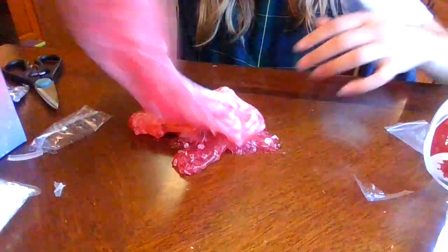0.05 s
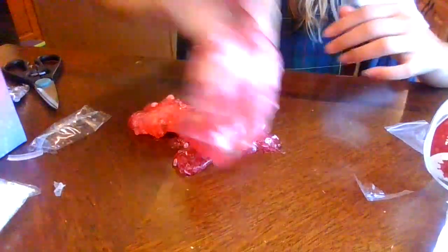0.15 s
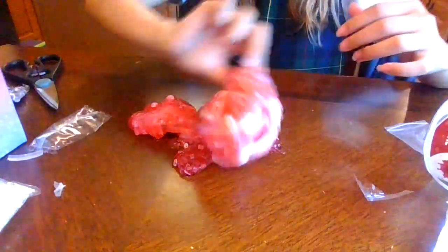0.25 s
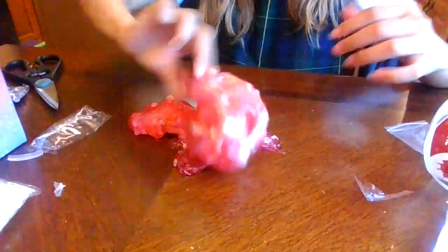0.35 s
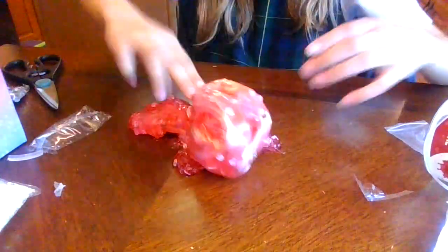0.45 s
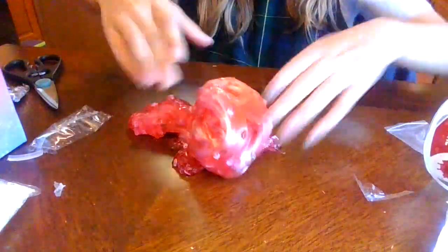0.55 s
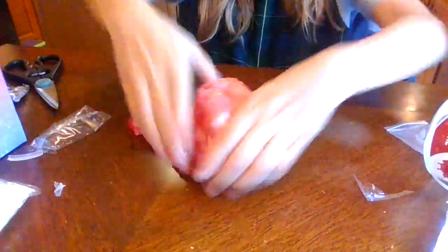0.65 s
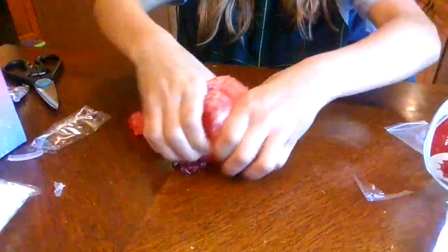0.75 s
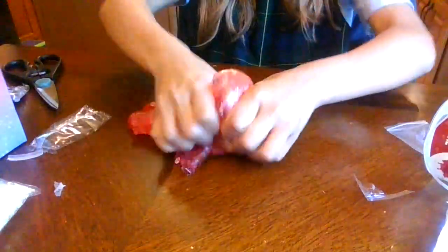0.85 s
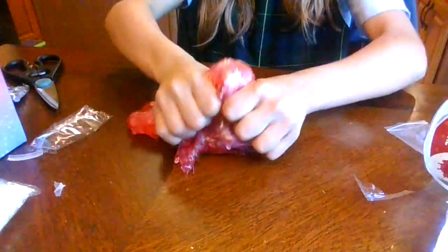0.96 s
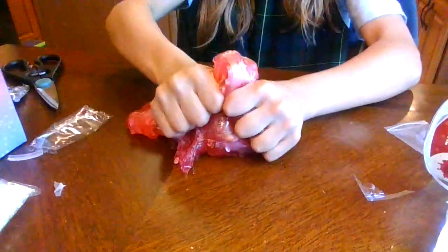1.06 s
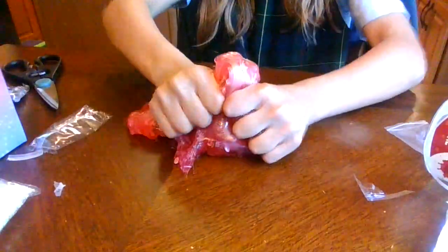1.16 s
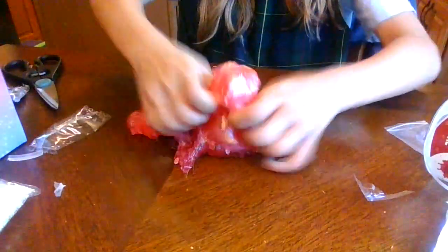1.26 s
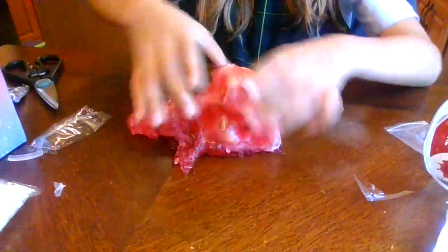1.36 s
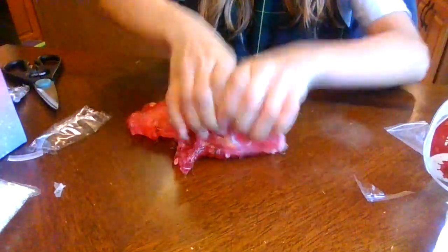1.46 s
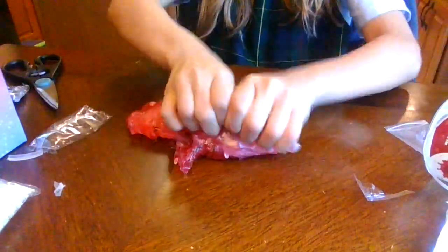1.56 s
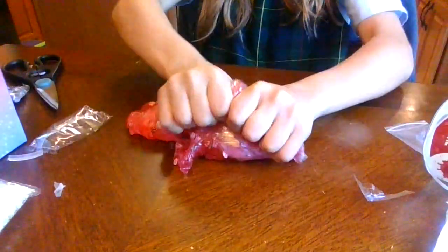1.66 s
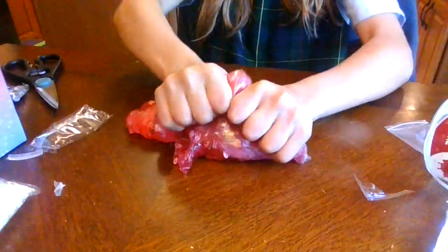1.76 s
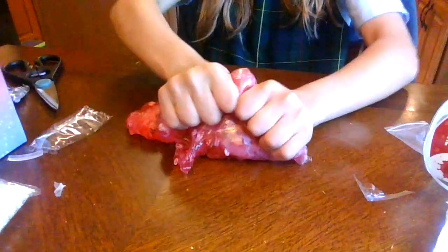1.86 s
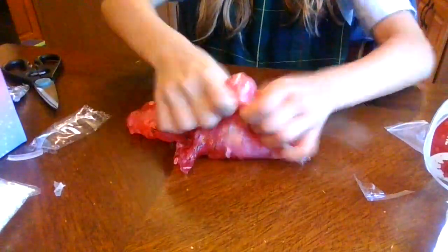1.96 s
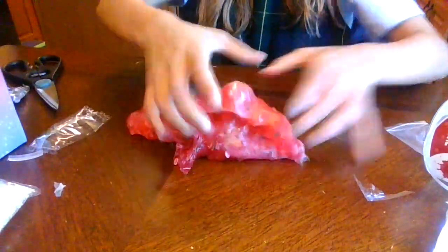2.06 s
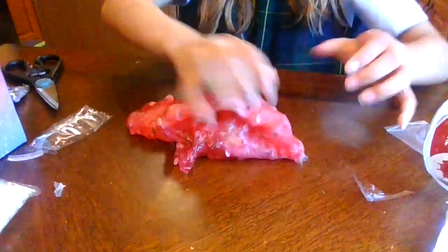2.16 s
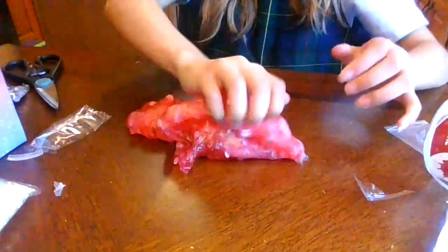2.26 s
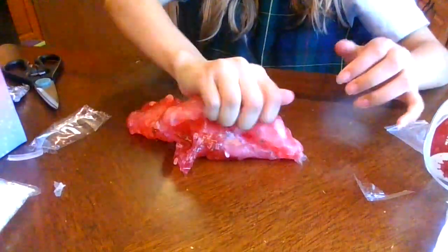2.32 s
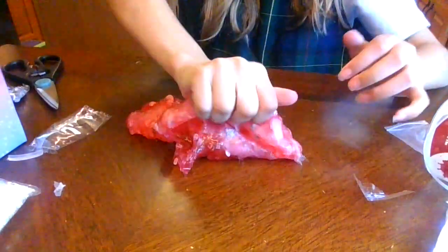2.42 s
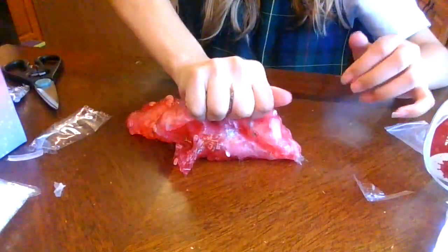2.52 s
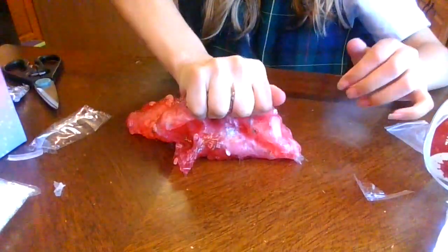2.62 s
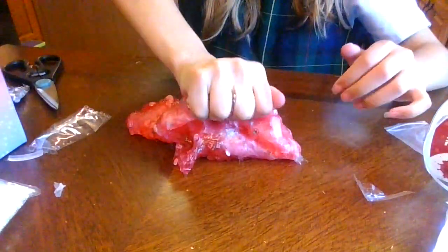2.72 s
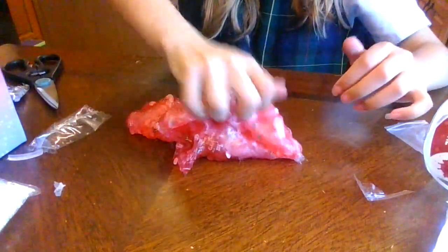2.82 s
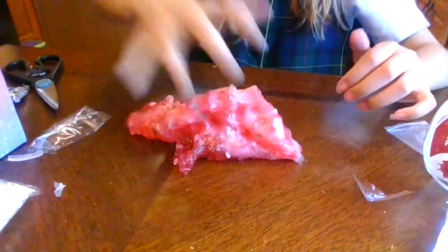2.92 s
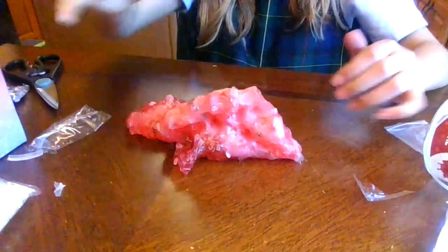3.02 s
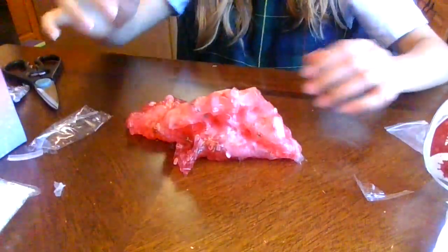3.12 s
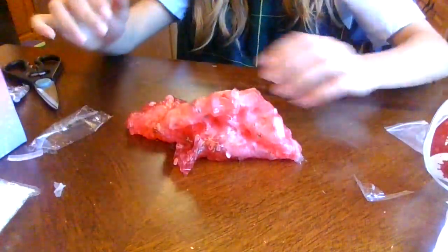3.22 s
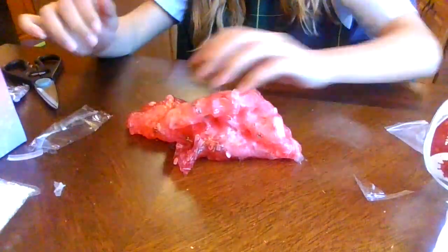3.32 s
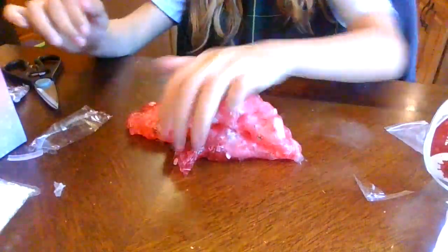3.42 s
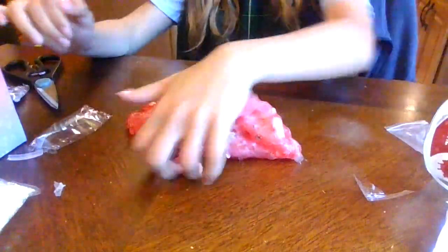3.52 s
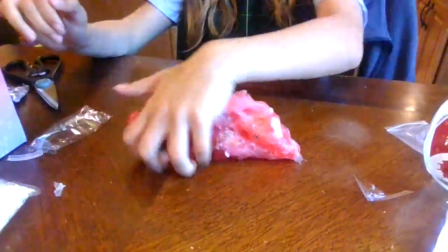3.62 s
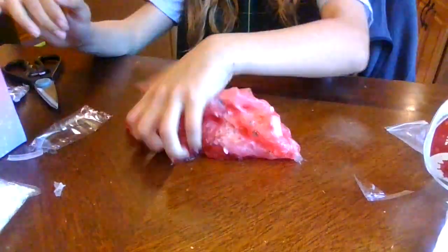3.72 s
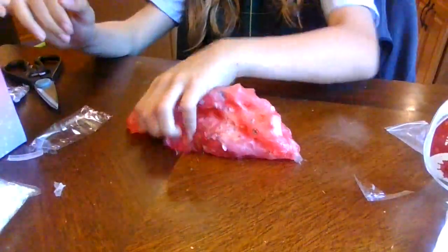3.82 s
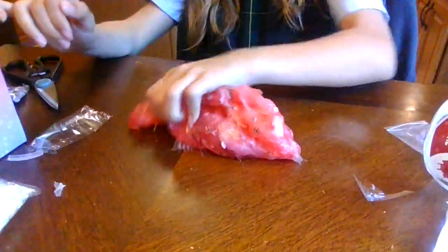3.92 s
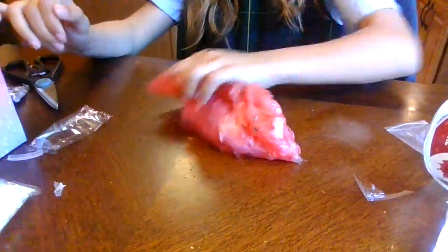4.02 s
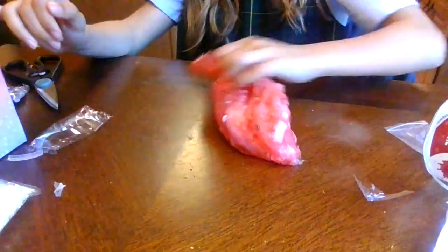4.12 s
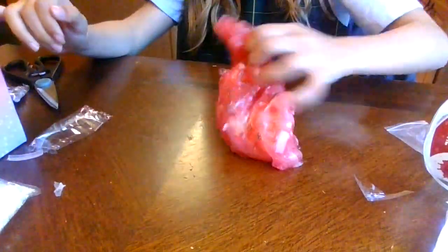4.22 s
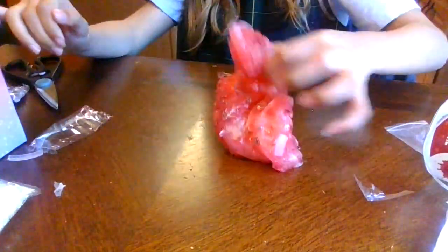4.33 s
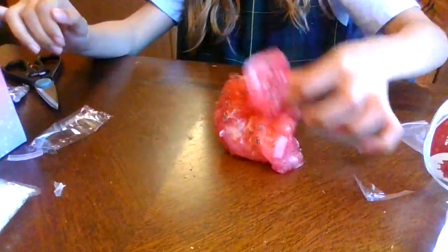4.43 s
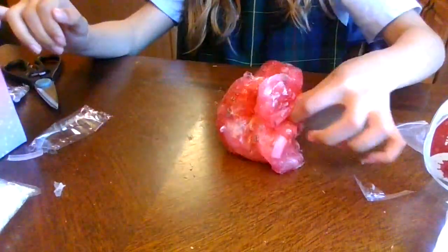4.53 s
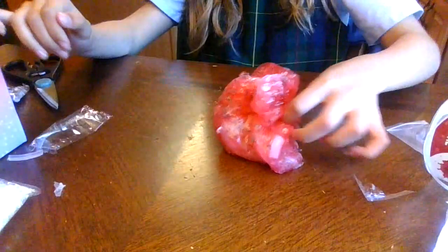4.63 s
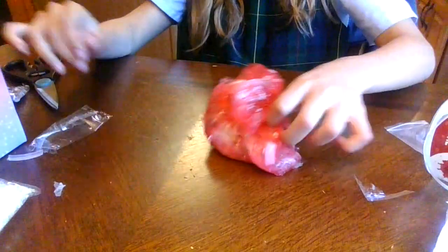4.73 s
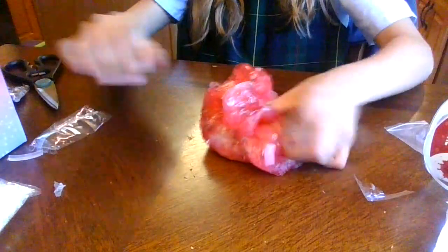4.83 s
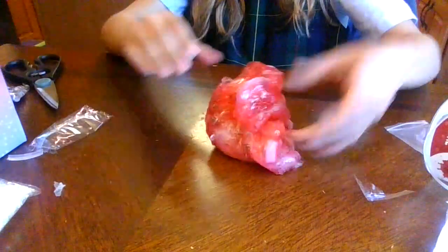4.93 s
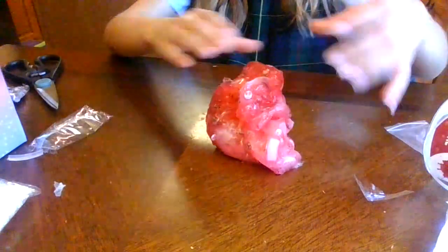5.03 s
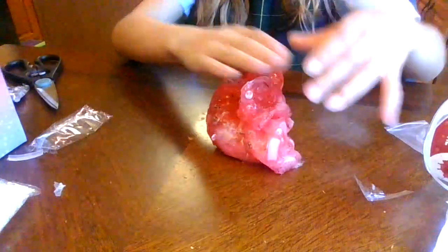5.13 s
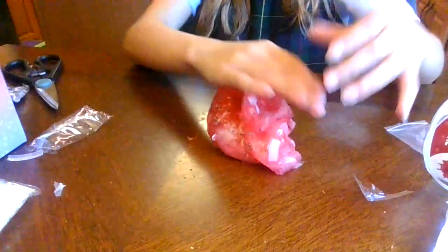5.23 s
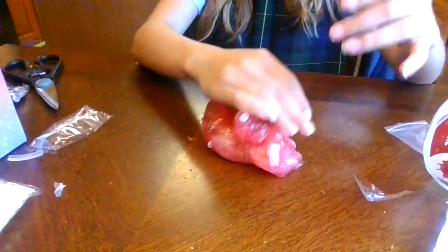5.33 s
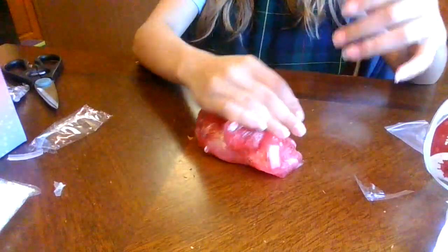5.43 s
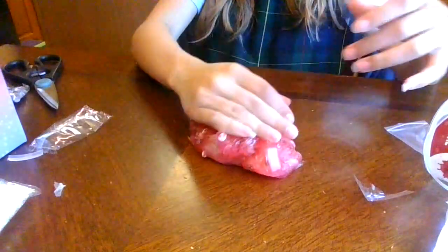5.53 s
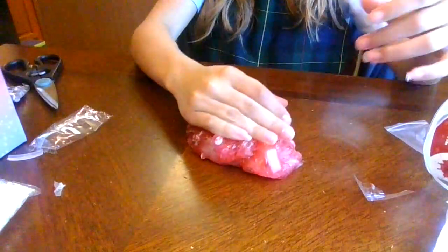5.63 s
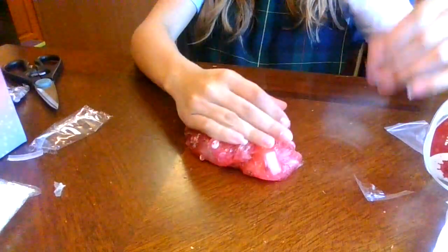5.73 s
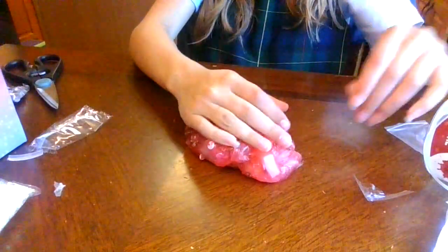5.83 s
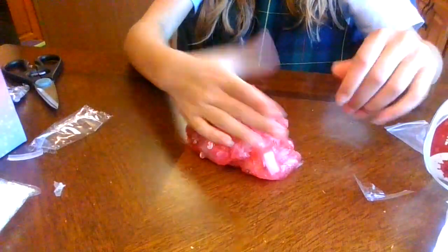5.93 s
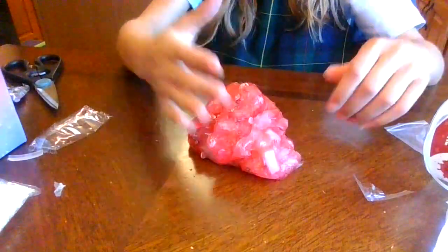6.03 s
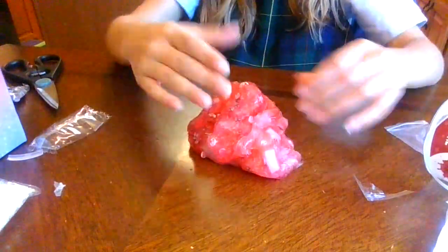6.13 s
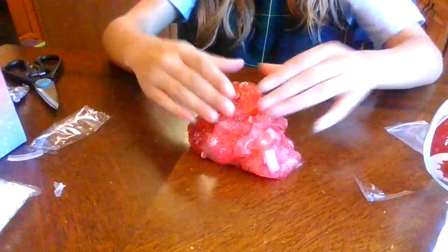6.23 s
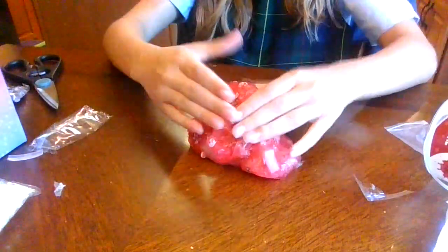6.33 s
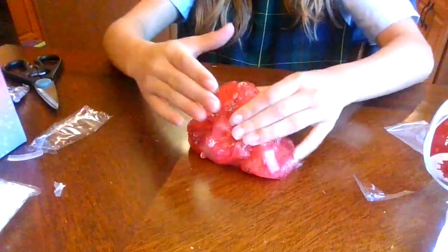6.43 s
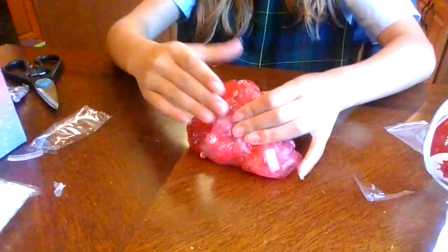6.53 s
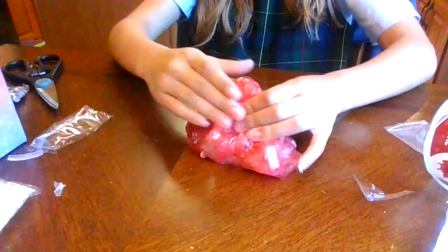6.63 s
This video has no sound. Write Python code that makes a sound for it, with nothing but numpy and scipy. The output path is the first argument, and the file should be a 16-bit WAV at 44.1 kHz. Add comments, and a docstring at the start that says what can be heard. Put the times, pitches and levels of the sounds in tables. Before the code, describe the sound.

Hands squeeze sticky slime close by, with sharp bubble pops, fizzy wet crackles and dull thumps on a wooden tabletop.

```python
"""Wet slime with beads is kneaded on a wooden table, close to one microphone.
Air pockets pop as their thin walls tear, fine foam crackles with each squeeze, and escaping bubbles ring.
Once, a pocket of air rings as the lump peels off the wood. Quick soft knocks come up through the table,
two hard squeezes jolt the microphone into overload, and a quiet room hums behind it all."""
import sys
import numpy as np
from scipy import signal
from scipy.fft import rfft, irfft, next_fast_len
from scipy.io import wavfile

SR = 44100
rng = np.random.default_rng(int(sys.argv[2]) if len(sys.argv) > 2 else 0)


def log_audio(samples):
    """Write samples as a 16-bit WAV file to the path given in sys.argv[1]."""
    # one column per channel
    frames = np.atleast_2d(samples).T
    # limit to full scale, then quantise
    limited = np.clip(frames, -1, 1)
    pcm = np.round(limited * 32767).astype(np.int16)
    wavfile.write(sys.argv[1], SR, pcm)


N = 294147
TIME = np.arange(N) / SR

# The three tone colours of bursting slime, each (frequency [Hz], level [dB]):
SNAP_COLOUR = [(1000, -5), (2500, -3.5), (5000, 0), (8000, -2), (12000, -45)]  # the sharp crack of a tearing film
BRIGHT_COLOUR = [(4000, -30), (8000, -4), (12000, 0), (15600, 0), (16100, -38)]  # the very high fizz
HOLLOW_COLOUR = [(300, 5.5), (700, -1.5), (1200, 4), (2200, -9.5), (3500, -22), (8000, -49)]  # the low, hollow sound of an air pocket


def pops():
    """An air pocket's wall tears: a short crack, then a weaker spatter. Big ones sound hollow and dull."""
    # the loudest air pockets: (time [s], level [dB], hollow part compared with that level [dB])
    pockets = [(0.3502, -9, -38), (0.405, -16, -49), (0.666, -3, -13), (0.708, 1, -19), (0.735, -3, -30),
               (0.748, -3, -28), (0.7814, -3, -12.5), (0.791, -6, -14), (0.8288, 1, -18), (0.847, 4, -12),
               (0.905, 5, -14), (0.9453, -11, -19), (1.0341, 15, -18), (1.0411, 10.5, -21),
               (1.0484, -10, -3), (1.0647, 3.5, 3.5), (1.0714, 10, -26), (1.0854, 13, -28), (1.0903, 9, -3),
               (1.1042, 11.5, -21), (1.1523, -2.5, -11), (1.4127, -4, -39), (1.424, -14, -10),
               (1.4473, -2.5, -14), (1.4775, -2, -14), (1.5082, -5, -21), (1.5337, 2, -20), (1.554, 3, -23),
               (1.568, -4, -24), (1.5739, 6, -25), (1.6084, 3, -12.5), (1.6437, 3, -12), (1.6498, 10, -7.5),
               (1.681, 18.5, -11.5), (1.7319, 16, -29), (1.821, -5, -24), (1.8289, 2, -38),
               (1.9854, 3, -30), (2.035, 2.5, -19), (2.0764, -11.5, -5.5), (2.1977, -14.5, -21),
               (2.2414, -16, -41), (2.275, -11, -15), (2.299, -2.5, -17), (2.3251, -7, -15),
               (2.369, 3, -24), (2.3905, -10, -12), (2.4342, -10, -27), (2.4433, -8, -16), (2.4817, 1, -18),
               (2.5194, -14, -25), (2.5308, -9.5, -42), (2.5436, -11, -49), (2.569, -6.5, -49),
               (2.604, -6.5, -41), (2.6408, -9, -17), (2.6458, -8, -25), (2.6554, -15, -8),
               (2.671, 10.5, -24.5), (2.8511, -0.5, -28), (2.8798, 6, -19), (3.4165, -14.5, -52),
               (3.4546, -15.5, -29), (3.5181, -11, -9), (3.5242, -4.5, -26), (3.6512, -1.5, -17.5),
               (3.6878, -12, -33), (3.7404, -2, -27), (3.7459, -3.5, -22), (3.7845, -4.5, -15.5),
               (3.7996, -2, -41), (3.8524, -7.5, -51), (3.8714, 1, -17.5), (3.9572, 0.5, -29),
               (4.0514, 4.5, -26), (4.2046, -10, -39), (4.2279, -5, -17), (4.3864, 0.5, -16.5),
               (4.394, -12, -31), (4.4503, -0.5, -21), (4.4857, -4, -19), (4.493, 4.5, -22),
               (4.5982, -3, -25), (4.7419, -6.5, -23), (4.7825, -14, -24), (4.812, -10, -16),
               (4.9106, -8, -17), (5.2768, -5, -29), (5.2935, -16.5, -25), (5.3394, -22, -21),
               (5.4183, -8.5, -2.5), (5.4385, -21, -41), (5.4799, -2, -18.5), (5.5193, -13, -24),
               (5.5331, -21, -33), (5.5782, -7.5, -13.5), (5.6002, -3, -28), (5.6281, -0.5, -17.5),
               (5.6708, -8, -36), (5.8924, -8, -36), (5.9, -6, -22), (5.9663, -8.5, -17),
               (6.3408, -21.5, -29), (6.4274, -9.5, -18), (6.444, -8, -22), (6.538, 5.5, -24)]
    s, db, hollow_db = np.transpose(pockets)

    def burst(level_db, t60):
        spatter = bursts(s, amp(level_db - 19), rise_s=0.0018, t60=10.9 * t60)
        return tears(s, level_db, t60) + spatter

    snap = burst(db - 18.5, t60=0.0087) * noise(SNAP_COLOUR)
    bright = burst(db - 15.5 - 0.15 * hollow_db, t60=0.006) * noise(BRIGHT_COLOUR)
    hollow = burst(db - 8 + hollow_db, t60=0.0095) * noise(HOLLOW_COLOUR)
    return snap + bright + hollow


def tears(s, level_db, t60, opening_s=0.0007):
    """Loudness of tearing films: each opens, holds just as long, then fades 60 dB in t60 seconds."""
    t = np.arange(SR // 10) / SR
    opening = np.clip(t / opening_s, 0, 1)
    fade = amp(-60 * np.clip(t - 2 * opening_s, 0, 1) / t60)
    return place(s, amp(level_db)[:, None] * opening * fade)


def foam():
    """Hundreds of tiny bubbles burst each second, now one by one, now merged into a wet hiss."""
    crackle_db, squelch_db, merged = squeezes()
    shared = grains(count=900, t60=0.0043)

    def texture(t60):
        """Each size of bubble bursts partly with the others, partly on its own."""
        return merged + (1 - merged) * (0.14 * shared + 0.29 * grains(count=800, t60=t60))

    bright = amp(crackle_db) * texture(t60=0.0014) * noise(BRIGHT_COLOUR)
    snap = amp(0.56 * crackle_db + 0.38 * squelch_db - 4.5) * texture(t60=0.033) * noise(SNAP_COLOUR)
    squelch = amp(squelch_db) * texture(t60=0.0077) * noise(HOLLOW_COLOUR)
    low = bubble_swarm(count=1500, scatter_db=4.3, hz=2150, spread=0.407, limits_hz=(600, 9000), cycles=15)
    high = bubble_swarm(1200, scatter_db=6.3, hz=6000, spread=0.444, limits_hz=(2000, 14000), cycles=13)
    return bright + snap + squelch + amp(squelch_db - 9.5) * low + amp(crackle_db - 12) * (1 - merged) * high


def squeezes():
    """Hands press the foam. Gives crackle [dB], wet squelch [dB] and the share of hiss over time."""
    # (full from [s], rise [s], hold [s], fall [s], crackle [dB], squelch [dB], merged into hiss [0-1])
    presses = [(0.354, 0.077, 0.015, 0.22, -24.5, -53, 0.22), (0.668, 0.0083, 0.31, .05, -18.5, -29.5, 0.2),
               (0.951, 0.11, 0.027, 0.099, -7, -17, 0.13), (1.03, 0.095, 0.038, 0.11, -12, -10.5, 0.34),
               (1.239, 0.12, 0.065, 0.076, -10, -20.5, 0.34), (1.471, 0.1, 0.15, 0.27, -16, -29.5, 0.17),
               (1.662, 0.1, 0.087, 0.17, -4.5, -21, 0.33), (1.917, 0.034, 0.11, 0.031, -15, -26.5, 0.45),
               (1.991, .1, .04, 0.082, -12, -26, 0.23), (2.051, .05, 0.031, .02, -27.5, -29, 0.33),
               (2.302, 0.044, 0.081, 0.26, -20.5, -40.5, .1), (2.507, 0.057, 0.062, 0.046, -24.5, -70, 0),
               (2.696, 0.092, .005, 0.44, -20.5, -46, 0.44), (2.802, 0.033, 0.03, .06, -21.5, -38, 0.73),
               (2.848, 0.02, .035, 0.023, -14, -31, .6), (3.447, 0.053, 0.0045, 0.023, -30.5, -35, 0.33),
               (3.519, 0.0067, .005, 0.18, -23.5, -29, 0.33), (3.622, 0.08, 0.25, 0.18, -28, -41, 0.2),
               (3.88, 0.041, .005, 0.33, -16.5, -28.5, 0.12),
               (3.967, 0.046, 0.038, 0.23, -11.5, -24.5, 0.39),
               (4.047, 0.046, 0.049, 0.056, -18.5, -32, .3), (4.223, 0.065, 0.0023, 0.13, -17.5, -37, 0.2),
               (4.384, 0.013, .005, 0.27, -28, -68, 0.56), (4.486, 0.032, .005, 0.24, -21.5, -34, 0.24),
               (4.63, 0.14, 0.1, .1, -38.5, -47, 0.1), (4.819, 0.076, 0.0046, 0.032, -28, -34, 0.54),
               (4.914, 0.17, .005, 0.078, -21, -30.5, 0.39), (5.296, 0.037, 0.043, 0.09, -32.5, -60, 0.1),
               (5.442, .2, .005, 0.22, -29.5, -37, 0.12), (5.66, 0.079, 0.0044, 0.14, -24, -54, 0.7),
               (5.894, 0.059, 0.024, .1, -23, -34, 0.54), (5.933, .05, 0.064, .03, -31, -43, 0.47),
               (6.542, 0.0065, 0.0029, .15, -10.5, -41, 0.71)]
    crackle = squelch = hiss = 0
    for s, rise, hold, fall, crackle_db, squelch_db, merged in presses:
        power = (amp(crackle_db) * swell(s, rise, hold, fall)) ** 2  # overlapping squeezes add power
        crackle += power
        hiss += merged * power
        squelch += (amp(squelch_db) * swell(s, rise, 0.78 * hold, 1.07 * fall)) ** 2
    return 10 * np.log10(crackle), 10 * np.log10(squelch), hiss / crackle


def bubble_swarm(count, scatter_db, hz, spread, limits_hz, cycles):
    """Small bubbles ring at random times, with pitches scattered around hz."""
    loudness, pitch = rng.standard_normal((count, 2)).T
    s = rng.random(count) * N / SR
    pitches_hz = np.clip(hz * np.exp(spread * pitch), *limits_hz)
    return unit(plinks(s, amp(scatter_db * loudness), pitches_hz, cycles))


def big_bubbles():
    """Trapped air rings briefly with a clear pitch as it escapes."""
    # the larger bubbles: (time [s], level [dB], pitch [Hz])
    bubbles = [(0.711, -8, 3950), (.782, -5, 3460), (0.948, -1, 2960), (1.555, -2, 5000),
               (2.324, -17, 2520), (3.891, -17, 1260), (3.903, -15.5, 2200), (3.928, -15, 3760),
               (3.966, -14, 2120), (3.983, -10.5, 2260), (4.005, -22, 2150), (4.387, -19, 1320),
               (4.598, -22, 1110), (4.812, -11.5, 4240), (4.876, -14, 4570)]
    s, db, hz = np.transpose(bubbles)
    return plinks(s, amp(db), hz, cycles=27)


def plinks(s, size, hz, cycles):
    """Each bubble is a tone that fades 60 dB in the given cycles while its pitch rises a little."""
    turns = hz[:, None] * np.arange(SR // 60) / SR
    tones = np.sin(2 * np.pi * turns * (1 + 0.00097 * turns))
    return place(s, size[:, None] * tones * amp(-60 * turns / cycles))


def peel():
    """The lump peels off the table, and a pocket of air rings with a grainy sound."""
    # the narrow band in which the pocket rings: (frequency [Hz], level [dB])
    cavity = [(1700, -30), (2100, 0), (2350, 0), (2900, -30)]
    loudness = amp(-30.5) * swell(full_s=4, rise_s=0.17, hold_s=0.0742, fall_s=0.1)
    return loudness * (0.35 + 0.57 * grains(count=900, t60=0.027)) * noise(cavity)


def table_knocks():
    """Soft knocks make the table top ring, each with a dull puff."""
    # knocks through the table: (time [s], level [dB])
    knocks = [(0.113, -35), (0.369, -29), (0.474, -23), (0.569, -28.5), (0.785, -26), (1.251, -23.5),
              (1.36, -27.5), (1.474, -19.5), (1.58, -23.5), (1.83, -28), (1.942, -27), (2.077, -20),
              (2.168, -24.5), (2.929, -34), (3.054, -33), (3.166, -34.5), (3.269, -37), (3.378, -34.5),
              (3.952, -31), (4.828, -29.5), (5.002, -35.5), (5.126, -28), (5.26, -25), (5.359, -24),
              (5.489, -33), (5.612, -29.5), (5.725, -28), (5.833, -25), (5.935, -28), (6.032, -30),
              (6.123, -26), (6.227, -26.5), (6.349, -26), (6.438, -24.5), (6.534, -26.5)]
    # the table top's own tones: (pitch [Hz], level [dB], time to fade 60 dB [s])
    wood_tones = [(54, -12, .3), (118, -3, .28), (194, -2, .28), (269, -3, .26), (330, -1, .15),
                  (435, -13, .2)]
    # the colour of the puff: (frequency [Hz], level [dB])
    puff_colour = [(150, 6), (350, -1.5), (1300, -15.5)]
    s, db = np.transpose(knocks)
    puff = bursts(s, amp(db - 12.5), rise_s=0.00073, t60=0.6) * noise(puff_colour)
    return puff + amp(1) * ring(knocks, wood_tones, rise_s=0.0012, scatter_db=3.0)


def hand_slaps():
    """A hand lands on the lump and makes it ring on the wood."""
    # the hand's landings: (time [s], level [dB])
    slaps = [(.667, -15.5), (3.518, -19.5)]
    # the tones of the lump on the wood: (pitch [Hz], level [dB], time to fade 60 dB [s])
    lump_tones = [(141.6, -6.5, 0.31), (168, 11, 0.028), (267, -1, 0.18), (430, -13, 0.14)]
    return ring(slaps, lump_tones, rise_s=0.0017, scatter_db=3.5)


def lump_drop(start_s=5.172, hz=90, first_swing=-0.36, bounce_keeps=0.68):
    """The dropped lump bounces dully: one soft swing of air pressure each time, with no ringing."""
    out = np.zeros(N)
    for k, delay_s in enumerate((0, 0.014, 0.039)):
        turns = hz * (TIME - start_s - delay_s)
        out += first_swing * bounce_keeps ** k * np.cos(2 * np.pi * turns) * np.exp(-(2.1 * turns) ** 2)
    return out


def microphone_jolts(sag_per_s=5):
    """Hard squeezes jolt the microphone: each swing of pressure climbs, sags while held and leaks away."""
    # swings of pressure: (start [s], rise [s], hold [s], fall [s], size [share of full scale])
    jolts = [(.965, .005, .002, .003, -.45), (1.0028, .0004, .0075, .0003, -1.4),
             (1.0107, .0004, .036, .003, 1.2), (1.049, .005, .05, .055, -1.05),
             (1.649, .003, .006, .002, -1.1), (1.659, .004, .015, .055, 1)]
    out = np.zeros(N)
    for s, rise, hold, fall, size in jolts:
        climb = np.clip((TIME - s) / rise, 0, 1)
        after = TIME - s - rise - hold  # negative until the hold ends
        out += size * climb * np.where(after < 0, 1 - sag_per_s * after, np.exp(-np.abs(after) / fall))
    return out


def room():
    """A steady hiss, a faint hum and the low rumble of moving arms and air."""
    # the colours of the hiss and of the rumble: (frequency [Hz], level [dB])
    hiss_colour = [(47, -26), (80, -15.5), (119, -5.5), (323, -11.5), (575, -29), (1000, -29),
                   (1340, -23.5), (2540, -31), (15700, -32), (16100, -80)]
    rumble_colour = [(15, -13), (30, -1.5), (60, -7.5), (110, -14)]
    # the tones of the hum: (pitch [Hz], average level [dB])
    hum_tones = [(118.4, -49.5), (193.8, -51.5)]
    # how the rumble grows and shrinks: (time [s], level [dB])
    sway = [(0, -42.5), (1, -38.5), (2.2, -41), (4.1, -50.5), (6.67, -38.5)]
    hum = sum(amp(db) * np.sqrt(2) * np.sin(2 * np.pi * hz * TIME) for hz, db in hum_tones)
    rumble_db = np.interp(TIME, *np.transpose(sway)) + 7
    return amp(-42) * noise(hiss_colour) + hum + amp(rumble_db) * noise(rumble_colour)


def ring(blows, tones, rise_s, scatter_db):
    """A struck object sounds the same fading tones at every blow, each time at new strengths."""
    out, t = np.zeros(N + SR), np.arange(SR // 2) / SR
    for s, db in blows:
        sound = 0
        for hz, level, t60 in tones:
            start_db = level + scatter_db * rng.standard_normal()
            sound += amp(start_db - 60 * t / t60) * np.sin(2 * np.pi * hz * t)
        out[round(s * SR):][:len(t)] += amp(db) * sound * (1 - np.exp(-t / rise_s))
    return out[:N]


def swell(full_s, rise_s, hold_s, fall_s):
    """Loudness that climbs 30 dB in rise_s, holds at 1, then sinks 30 dB in each fall_s."""
    before, after = (full_s - TIME) / rise_s, (TIME - full_s - hold_s) / fall_s
    return amp(-30 * np.clip(np.maximum(before, after), 0, 4))


def grains(count, t60):
    """Loudness curve of random bursts, most small and a few large."""
    when, chance = rng.random((count, 2)).T
    size = np.minimum(amp(-7 * np.log(1 - chance)), 6)
    return unit(bursts(when * N / SR, size, rise_s=0.00025, t60=t60))


def bursts(s, size, rise_s, t60):
    """Loudness curve of bursts at times s: each rises, fades 60 dB per t60 seconds and ends at 1/8 s."""
    t = np.arange(SR // 8) / SR
    shape = (1 - np.exp(-t / rise_s)) * amp(-60 * t / t60)
    starts = np.bincount((s * SR).astype(int), size, N)[:N]
    return np.abs(signal.fftconvolve(starts, shape / shape.max())[:N])


def place(s, sounds):
    """Adds short sounds, one per row, into one track at times s."""
    at = (s * SR).astype(int)[:, None] + np.arange(sounds.shape[1])
    return np.bincount(at.ravel(), sounds.ravel(), N)[:N]


def noise(colour):
    """Noise of average strength 1, shaped by (frequency [Hz], level [dB]) points."""
    m = next_fast_len(N)
    hz, db = np.transpose(colour)
    log_hz = np.log(np.fft.rfftfreq(m, 1 / SR) + 1)
    gain = amp(np.interp(log_hz, np.log(hz), db, left=-120, right=-120))
    return unit(irfft(rfft(rng.standard_normal(m)) * gain, m)[:N])


def below(x, top_hz):
    """Removes everything above top_hz."""
    m = next_fast_len(N + SR // 4)
    return irfft(rfft(x, m) * (np.fft.rfftfreq(m, 1 / SR) < top_hz), m)[:, :N]


def amp(db):
    """Turns decibels into a multiplier."""
    return 10 ** (np.asarray(db) / 20)


def unit(x):
    """Scales x to an average strength (rms) of 1."""
    return x / np.sqrt(np.mean(x ** 2) + 1e-20)


def scene():
    """One microphone hears everything and feeds both channels."""
    slime = pops() + foam() + big_bubbles() + peel()
    thumps = table_knocks() + hand_slaps() + lump_drop()
    return np.tile(slime + thumps + microphone_jolts() + room(), (2, 1))


def record(dry, full_scale=0.96):
    """The sound has no treble above 16 kHz; overload rounds off peaks and adds a little above that."""
    trimmed = below(dry, top_hz=16000)
    rounded = trimmed / (1 + np.abs(trimmed / full_scale) ** 12) ** (1 / 12)
    return below(rounded, top_hz=16900)


dry = scene()
out = record(dry)
log_audio(out)
```